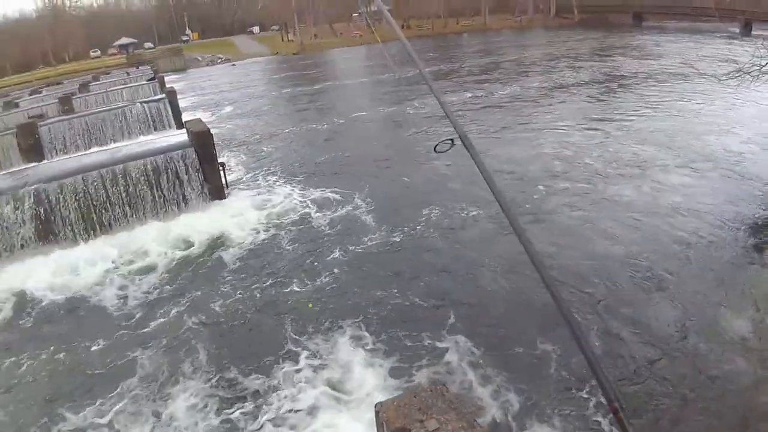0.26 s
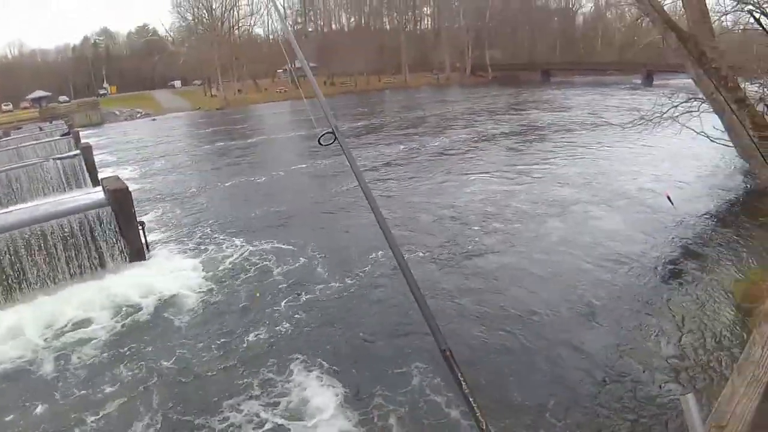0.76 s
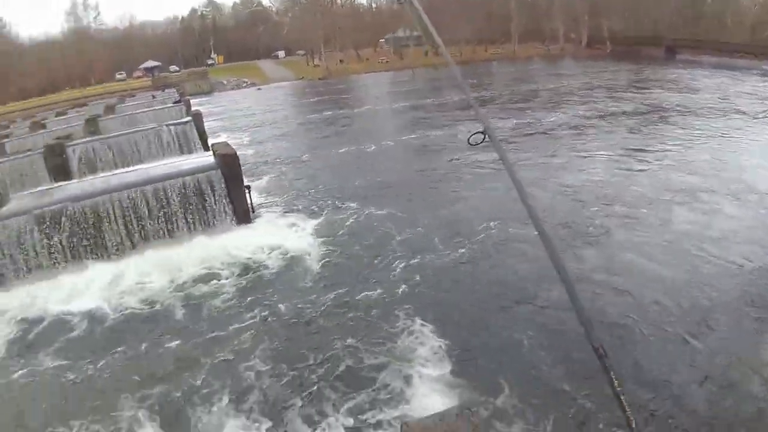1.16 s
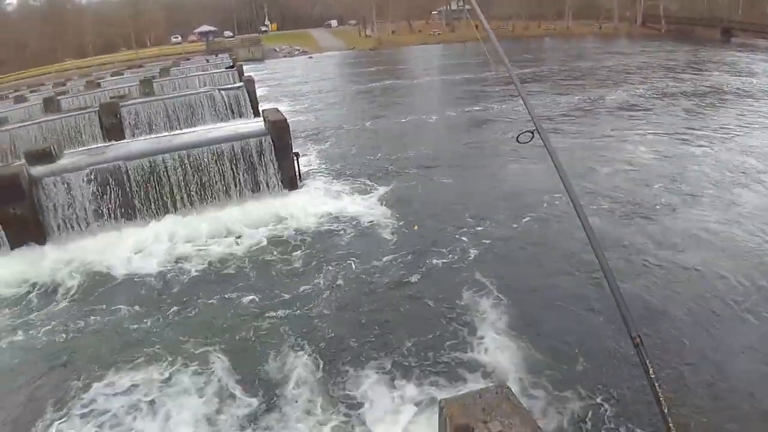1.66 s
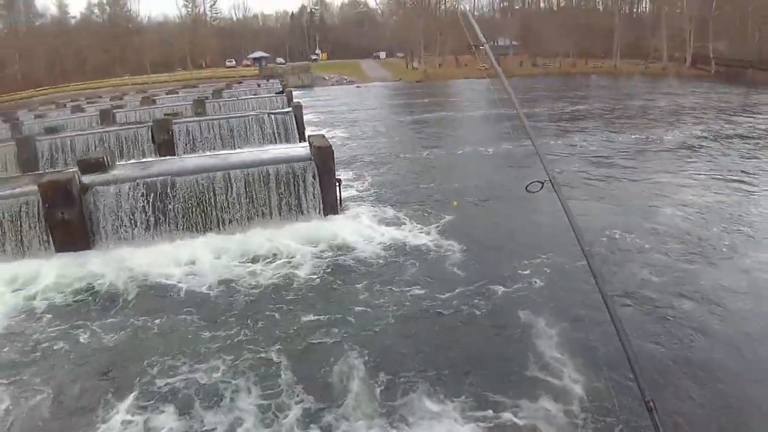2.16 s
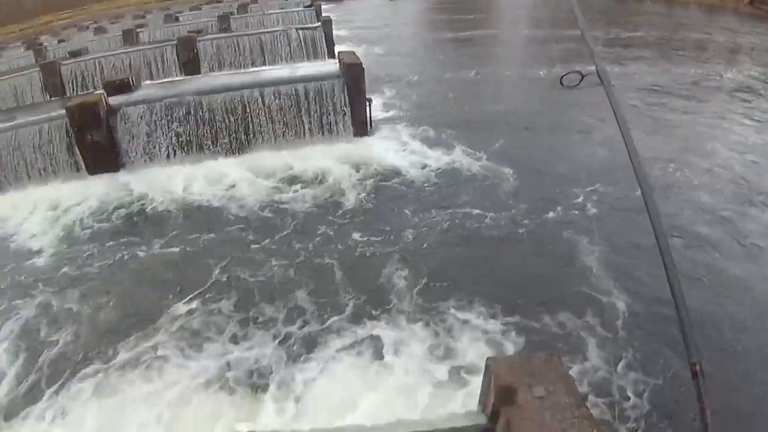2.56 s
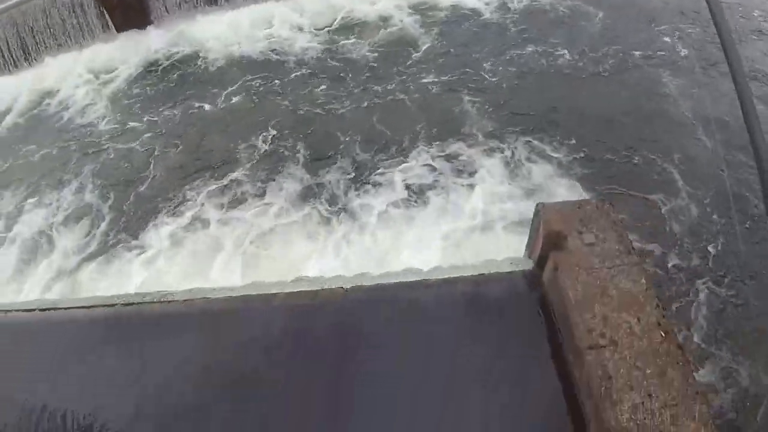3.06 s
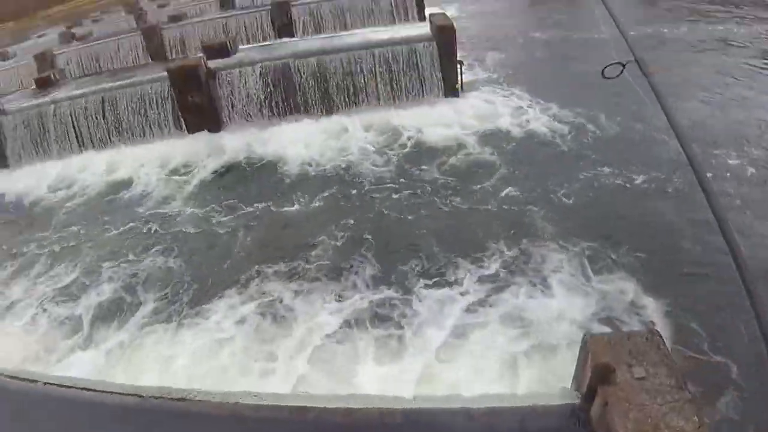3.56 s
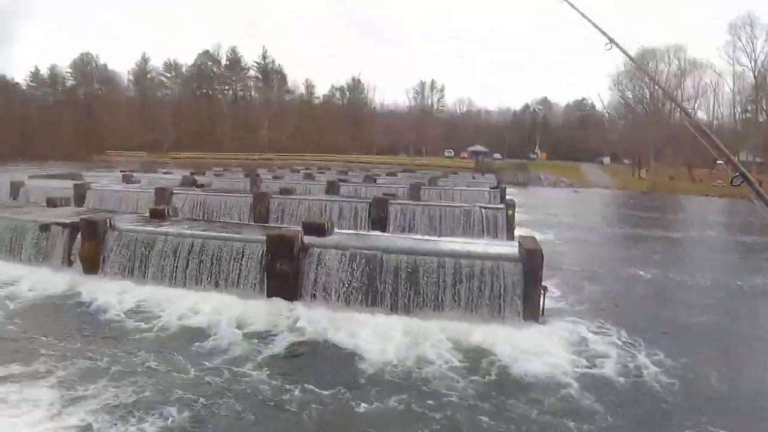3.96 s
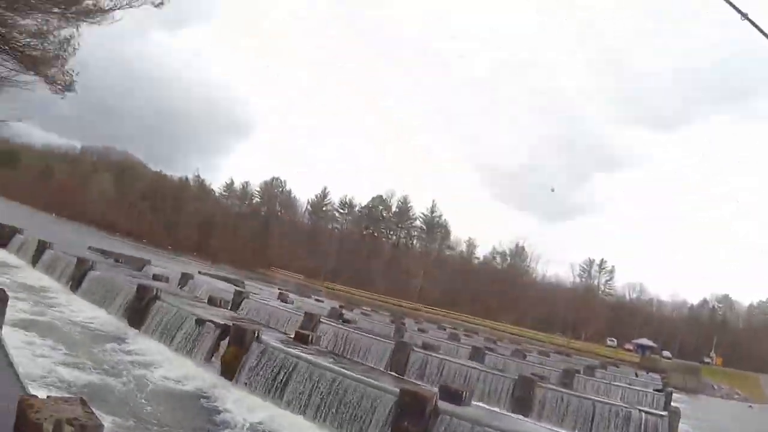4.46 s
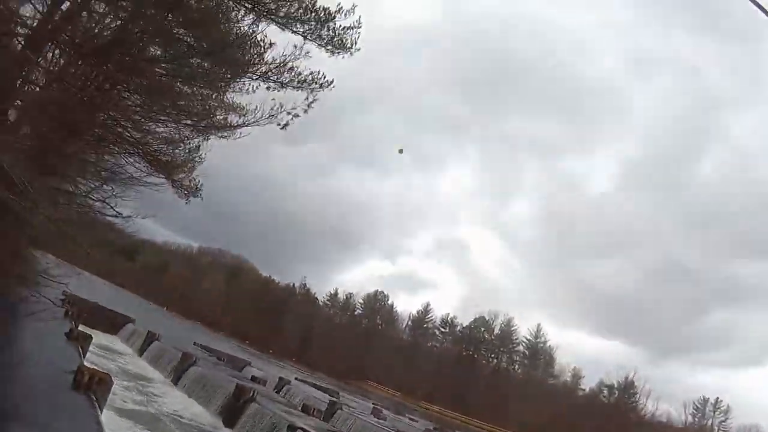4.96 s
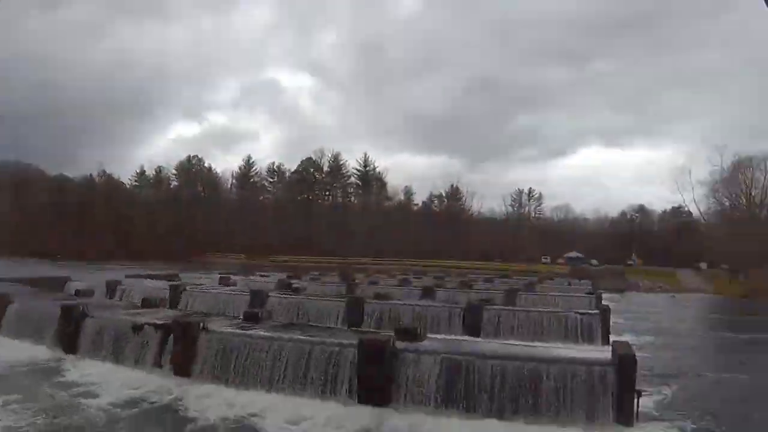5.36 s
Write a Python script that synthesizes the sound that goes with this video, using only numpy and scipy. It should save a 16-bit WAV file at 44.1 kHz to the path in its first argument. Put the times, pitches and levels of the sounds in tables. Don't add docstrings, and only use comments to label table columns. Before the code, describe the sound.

For about five and a half seconds, a broad, loud rush of river water falls over weir steps and churns below, almost like noise, with fast flickering and small bubbly rings within it. The start carries a faint, dying metallic ping around the first fraction of a second, and small level dips recur. The water leans to the left at first. At about 3.3 seconds a fishing reel gives one hard, dry, very brief metallic snap close to the microphone; the roar ducks sharply and recovers within about a tenth of a second. From about 3.8 seconds the wearer turns to the weir, so the stereo balance shifts toward the right and fine spray brightens, strongest near 4.7, then eases back. Soft low knocks on the housing come at about 3.9 and, fainter, 4.9 seconds. The small stereo microphone sounds mid-heavy, with thin, patchy treble and little deep bass.

```python
import sys
import numpy as np
from scipy import signal
from scipy.fft import rfft, irfft, next_fast_len
from scipy.io import wavfile
from scipy.ndimage import uniform_filter1d

SR = 44100
rng = np.random.default_rng(int(sys.argv[2]) if len(sys.argv) > 2 else 0)


def wav_record(signal):
    frames = np.transpose(np.atleast_2d(signal))
    bounded = np.clip(frames, -1, 1)
    quanta = np.round(bounded * 32767).astype(np.int16)
    wavfile.write(sys.argv[1], SR, quanta)


def gain_from_db(level_db):
    decades = np.asarray(level_db, float) / 20
    return 10 ** decades


N = 246959
TOP_FROM_HZ = 7500


def rms_one(x):
    return x / np.sqrt(np.mean(np.abs(x) ** 2) + 1e-20)


def at_hz(points, hz):
    f, v = np.transpose(points)
    return np.interp(np.log(hz + 1), np.log(f + 1), v)


def high_pass(x, hz):
    return signal.sosfilt(signal.butter(4, hz, "high", fs=SR, output="sos"), x)


def drift(rate_hz):
    step = 40
    pole = np.exp(-2 * step * np.pi * rate_hz / SR)
    noise = rng.standard_normal(N // step + 2002)
    slow = signal.lfilter([1], [1, -2 * pole, pole * pole], noise)[2000:]
    return np.interp(np.arange(N) / step, np.arange(len(slow)), rms_one(slow))


def ring(clicks, hz, t60_s):
    r = gain_from_db(-60 / (t60_s * SR))
    w = 2 * np.pi * hz / SR
    return signal.lfilter([0, np.sin(w)], [1, -2 * r * np.cos(w), r * r], clicks + 1e-18)


def churn(per_s, spread_db):
    sizes = gain_from_db(spread_db * np.minimum(rng.exponential(1, (2, N)), 5))
    sizes = sizes * rng.standard_normal((2, N))
    return rms_one(sizes * (rng.random((2, N)) < per_s / SR))


# pitch in Hz, level in dB per Hz.
WATER_DB = [(15, -50), (25, -31), (60, -24), (120, -21), (200, -17), (300, -9.5), (430, -6.5), (900, -4.5),
            (1600, -4.5), (2400, -4),
            (3200, -2), (3900, .3), (4700, 2), (5150, .2), (5700, -4), (6300, -9), (6800, -15),
              (7120, -24), (7900, -58), (8480, -28), (9200, -20.5), (11000, -23.5), (13000, -26),
              (15300, -31.5)]
# pitch in Hz, left-right likeness 0-1.
LIKENESS = [(30, .25), (60, .3), (130, .6), (290, .92), (900, .92), (2000, .75), (6200, .7), (7500, .5),
            (9000, .4), (15000, .25)]
# pitch in Hz, left over right in dB.
LEAN_DB = [(30, 1.5), (120, 2.5), (300, 4), (900, 5), (1600, 6), (2400, 8), (4200, 11.5), (5100, 7),
           (5700, 2), (6800, 1.5), (8500, 1), (9300, 2), (13000, 7), (15000, 3)]
# pitch in Hz, lead in radians.
LEAD_AHEAD_RAD = [(0, 0), (1400, .45), (2800, .7), (4100, .5), (4900, 0), (6200, .8), (8200, .8),
                  (8900, 2.2), (15000, 3.1)]
# pitch in Hz, lead in radians.
LEAD_TURNED_RAD = [(0, 0), (1400, .1), (3400, -.1), (5000, -1), (6200, -.7), (7500, 0), (9000, .1),
                   (15000, -.7)]
# pitch in Hz, share of the sway.
TURN_SHARE = [(200, .1), (900, .15), (2400, 0.97), (4500, 0.49), (7000, 1.35), (12000, 0.9)]
# time in seconds, turn 0-1.
TURN = [
    (0, 0.14),
    (1.0, 0.17),
    (2.4, 0.35),
    (3.2, 0.16),
    (3.8, 0.54),
    (4.7, 1),
    (5.1, 0.84),
    (5.6, 0.34),
]


def weir():
    roar_db, spray_gain_db, lean_loss_db, turn_rest = -19, 3, 5.5, 0.15
    nod_s, nod_half_s, nod_loss_db = 2.95, 0.26, 1
    time_s = np.arange(N) / SR
    turn = np.interp(time_s, *np.transpose(TURN))
    nod = np.exp(-((time_s - nod_s) / nod_half_s) ** 2)
    spray_db = spray_gain_db * turn - nod_loss_db * nod

    size = next_fast_len(N)
    hz = np.fft.rfftfreq(size, 1 / SR)
    colour = gain_from_db(at_hz(WATER_DB, hz))
    left, own = rfft(churn(per_s=30000, spread_db=1.5), size) * colour
    alike = np.clip(at_hz(LIKENESS, hz), 0, 1)
    lead_rad = at_hz(LEAD_AHEAD_RAD, hz)
    right = alike * left * np.exp(-1j * lead_rad) + np.sqrt(1 - alike ** 2) * own
    lean = gain_from_db(-at_hz(LEAN_DB, hz))
    even = 2 / np.sqrt(1 + lean ** 2 + 2 * alike * lean * np.cos(lead_rad))
    left, right = left * even, right * lean * even

    swell, heave = drift(4.0), drift(0.4)
    out = np.zeros((2, N))
    for centre_hz in 22 * 2 ** (np.arange(20) / 2):
        octaves = np.log2((hz + 1) / centre_hz)
        window = np.cos(np.pi / 2 * np.clip(2 * octaves, -1, 1)) ** 2
        near, far, far_late = irfft(window * np.array([left, right, -1j * right]), size)[:, :N]
        lead_change_rad = at_hz(LEAD_TURNED_RAD, centre_hz) - at_hz(LEAD_AHEAD_RAD, centre_hz)
        swing_rad = np.minimum(0.89 * turn, 1) * lead_change_rad
        far = np.cos(swing_rad) * far + np.sin(swing_rad) * far_late
        sway_db = at_hz(TURN_SHARE, centre_hz) * lean_loss_db * (turn_rest - turn)
        gain_db = 0.23 * swell + 0.057 * heave + 0.59 * drift(13.4)
        if centre_hz > TOP_FROM_HZ:
            gain_db = gain_db + spray_db
        out += gain_from_db(gain_db) * np.array([near * gain_from_db(0.27 * sway_db), far * gain_from_db(-0.7 * sway_db)])
    return gain_from_db(roar_db) * out / np.sqrt(np.mean(out.mean(axis=0) ** 2))


def bubbles(per_s, level_db):
    sizes = gain_from_db(4.1 * np.minimum(rng.exponential(1, N), 5)) * rng.choice([-1, 1], N)
    born = rng.random(N) < per_s / SR
    pitches_hz = np.geomspace(250, 2200, 16)
    dealt = rng.integers(0, 16, N)
    rings = sum(ring(sizes * born * (dealt == k), hz, 3.9 / hz) for k, hz in enumerate(pitches_hz))
    port_db = np.array([[2.0], [-2.5]])
    return gain_from_db(level_db) * rms_one(high_pass(rings, 256)) * gain_from_db(port_db)


# start in seconds, peak in dB, contact length in seconds.
SNAP = (3.28615, 2.5, .0003)
# pitch in Hz, left level in dB, right level in dB, t60 in seconds.
REEL_MODES = [(3800, -15, -14, .012), (4500, -7, -15, .012), (5500, -2, 0, .0055), (6700, -12, -9, .012),
              (9500, -20, -18, .007), (12100, -16, -29, .004), (14200, -20, -31, .004)]
# pitch in Hz, level in dB, t60 in seconds.
EARLIER_PING = [(1850, -20.5, .2), (1930, -22, .25), (2010, -25, .2)]


def reel():
    start_s, peak_db, contact_s = SNAP
    since_s = np.arange(SR // 20) / SR
    body = np.zeros((2, len(since_s)))
    for hz, left_db, right_db, t60_s in REEL_MODES:
        decay_db = np.array([[left_db], [right_db]]) - 60 * since_s / t60_s
        body += gain_from_db(decay_db) * np.sin(2 * np.pi * hz * since_s)
    body *= 1 - np.exp(-since_s / contact_s)
    knock = np.arange(N) == 0
    ping = sum(gain_from_db(db) * ring(knock, hz, t60_s) for hz, db, t60_s in EARLIER_PING)
    out = ping * gain_from_db(np.array([[3.0], [-3.0]]))
    snap = gain_from_db(peak_db) * high_pass(body, 1300) / np.abs(body).max()
    out[:, round(start_s * SR):][:, :len(since_s)] += snap
    return out


# time in seconds, level in dB.
BUMPS = [
    (3.862, -30.5),
    (4.868, -34),
]
# pitch in Hz, level in dB, t60 in seconds.
HOUSING_THUD = [(150, -7, .06), (235, 0, .06)]


def bump():
    time_s, push_s = np.arange(N) / SR, 0.0008
    push = sum(gain_from_db(db - 36) * np.exp(-((time_s - s) / push_s) ** 2) for s, db in BUMPS)
    thud = sum(gain_from_db(db) * ring(push, hz, t60_s) for hz, db, t60_s in HOUSING_THUD)
    return high_pass(thud, 109)


def scene():
    return weir() + bubbles(per_s=400, level_db=-43.0) + reel() + bump()


# pitch in Hz, level in dB per line.
DROP_UNDER_DB = [(6000, -95), (6900, -70), (7200, -61), (8500, -63), (9300, -65), (12000, -67),
                 (15300, -69)]


def thin_treble(x, shift_db, wobble_db):
    sudden_db, short_s, lead_in = 7.5, 0.01, 85
    frames = dict(fs=SR, window="cosine", nperseg=2048, noverlap=1024)
    treble = uniform_filter1d(np.abs(high_pass(x, TOP_FROM_HZ)).mean(axis=0), size=64)
    leaps = 1.0 * (treble > gain_from_db(sudden_db) * np.median(treble))
    whole = np.clip(30 * uniform_filter1d(leaps, size=round(short_s * SR)), 0, 1)
    hz, _, lines = signal.stft(np.pad(x * (1 - whole), ((0, 0), (lead_in, 0))), **frames)
    count = lines.shape[2]

    def patches(width):
        draws = rng.exponential(1, (len(hz) // width + 1, count // 2 + 1))
        return draws.repeat(width, axis=0)[:len(hz)]

    wide = patches(32)
    narrow = patches(8)
    wobble = (0.5 * wide + 0.9 * narrow).repeat(2, axis=1)[:, :count]
    thrift = rng.standard_normal(count)
    wander_db = wobble_db * (wobble - 1.3 + 0.3 * thrift)
    threshold = gain_from_db(at_hz(DROP_UNDER_DB, hz)[:, None] + shift_db + wander_db)
    loudness = np.abs(lines).mean(axis=(0, 1))
    level = np.sqrt(np.mean(np.abs(lines) ** 2, axis=0))
    kept = level > threshold * loudness / np.median(loudness)
    return x * whole + signal.istft(lines * kept, **frames)[1][:, lead_in:N + lead_in]


def top_cut(x):
    return signal.sosfilt(signal.butter(12, 15200, fs=SR, output="sos"), x)


# time in seconds, level over threshold in dB.
SURGES = [(0.0, 7), (.1, 1.5), (.228, 1.5), (.393, 3.5), (.87, 1.5), (1.474, 4), (1.677, 1.5), (2.143, 3),
          (3.2854, 13.5), (4.66, 2.5), (4.871, 3.5)]


def record(dry):
    limit_db, release_db_s, attack_s, wait_s = -3, 135, 0.0005, 0.0017
    peak_db = 20 * np.log10(np.abs(dry).max(axis=0) + 1e-9)
    over_db = np.maximum(peak_db - limit_db, 0)
    for s, surge_db in SURGES:
        over_db[max(round(s * SR), 0)] = surge_db
    ramp_db = release_db_s * np.arange(N) / SR
    held_db = np.maximum.accumulate(over_db + ramp_db) - ramp_db
    late_db = np.interp(np.arange(N) - wait_s * SR, np.arange(N), held_db)
    r = np.exp(-1 / (attack_s * SR))
    duck_db = signal.lfilter([1 - r], [1, -r], late_db, zi=[r * late_db[0]])[0]
    clipped = np.clip(dry * gain_from_db(-duck_db), -1, 1)
    return top_cut(thin_treble(clipped, shift_db=-1.5, wobble_db=6.5))


dry = scene()
out = record(dry)
wav_record(out)
```